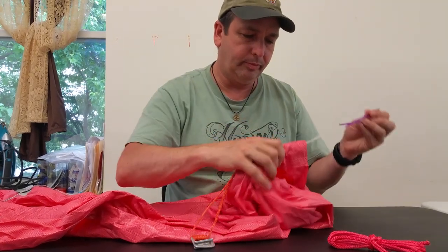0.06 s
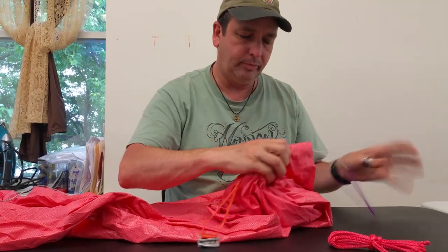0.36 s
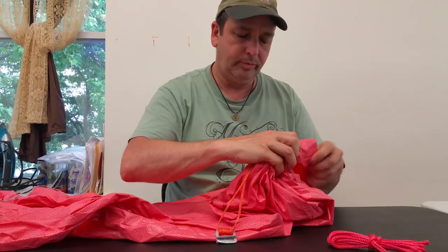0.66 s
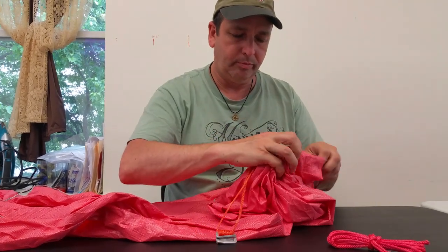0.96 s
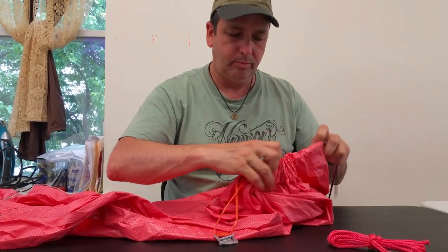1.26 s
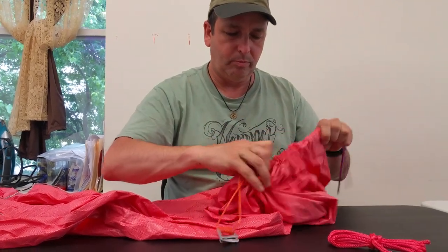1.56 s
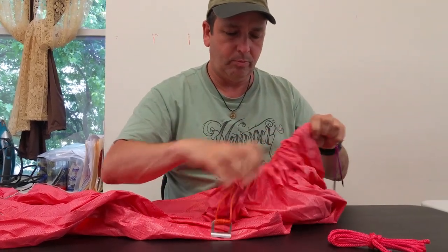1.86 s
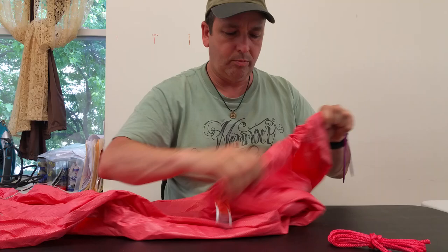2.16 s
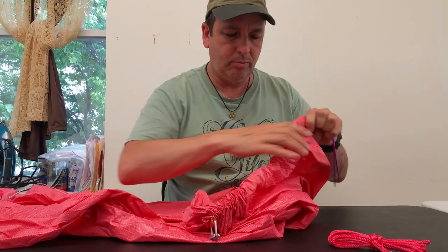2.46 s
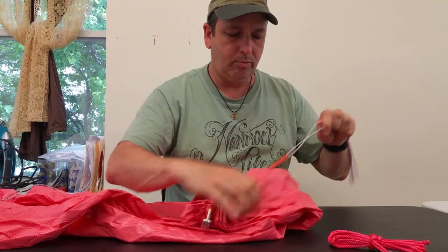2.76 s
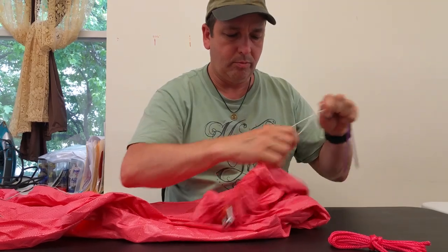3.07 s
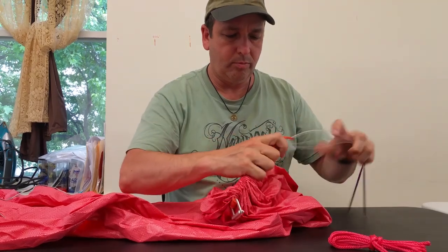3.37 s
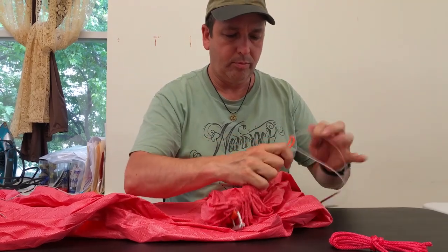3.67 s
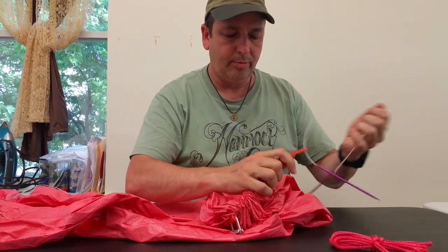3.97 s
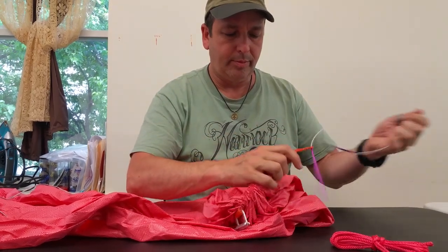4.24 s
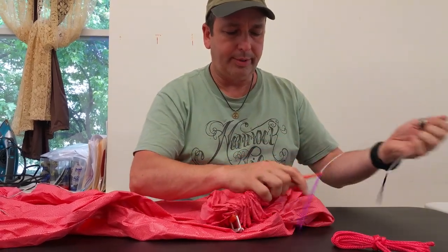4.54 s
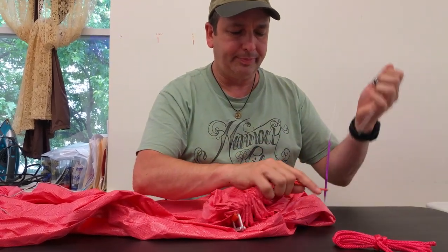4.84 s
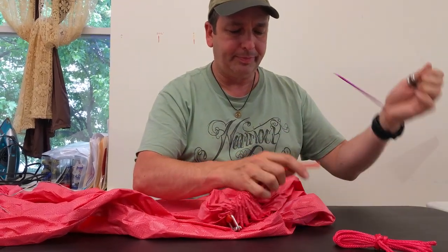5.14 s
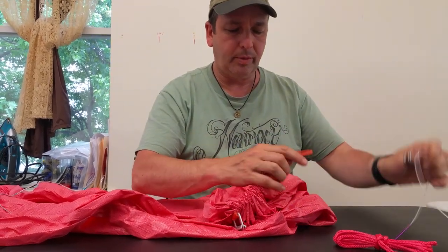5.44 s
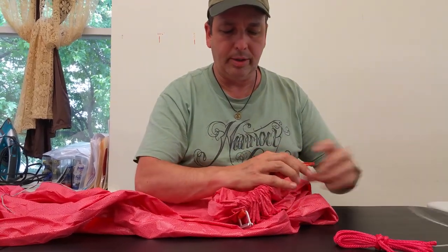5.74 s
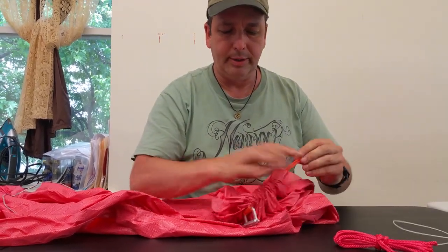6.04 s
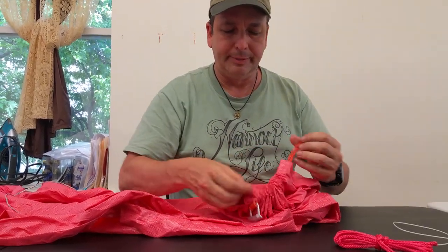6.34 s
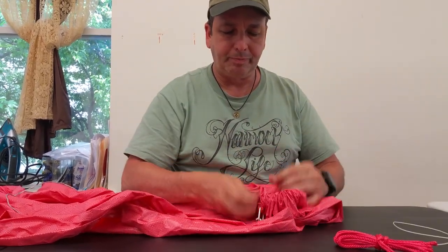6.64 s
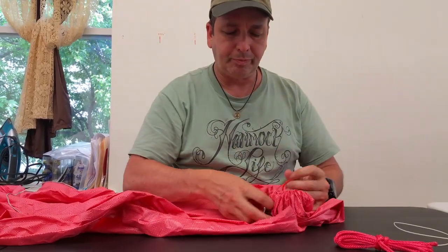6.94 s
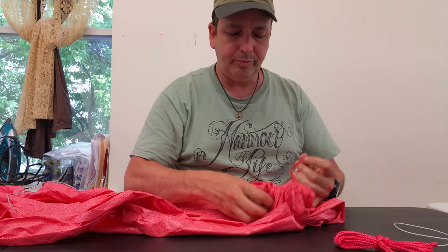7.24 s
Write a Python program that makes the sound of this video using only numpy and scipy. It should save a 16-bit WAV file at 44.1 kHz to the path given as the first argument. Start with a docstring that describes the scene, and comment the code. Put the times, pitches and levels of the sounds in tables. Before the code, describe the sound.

Soft fabric rustling with light table bumps, sharp buckle clinks and a few bright clatters of wire in a small room.

```python
"""A swish of thin nylon and a few soft bumps, then a bright clatter of wire: fabric is bunched along a cord
at a table in a small live room, a metre from the microphone. Cloth rubs on cloth and its creases crinkle.
The cord's stiff threading wire taps, scrapes and twangs on the table top, a small metal buckle clinks,
and hands bump the table. Quiet room air and a mains hum lie underneath."""
import sys
import numpy as np
from scipy import signal
from scipy.fft import rfft, irfft, next_fast_len
from scipy.io import wavfile
from scipy.ndimage import uniform_filter1d

SR = 44100
rng = np.random.default_rng(int(sys.argv[2]) if len(sys.argv) > 2 else 0)


def materialize(psi):
    """Save the field psi as 16-bit PCM at rate SR to the path in sys.argv[1].

    A 1-D psi becomes a single channel; in a 2-D psi each row is a channel.
    """
    bounded = np.clip(np.atleast_2d(psi).T, -1, 1)
    quanta = np.round(bounded * 32767).astype(np.int16)
    wavfile.write(sys.argv[1], SR, quanta)


N = 322099

# Hands push and pull the cloth. Each row: middle in seconds, length in seconds, level in dB, treble in dB.
CLOTH_FOLDS = [(0.01, 0.13, -42, -3), (0.19, 0.22, -53, 4.5), (0.408, 0.086, -48.5, -6),
               (0.748, 0.29, -43.5, -14), (0.986, 0.23, -49.5, -0.5), (1.3, 0.16, -49, 3),
               (1.379, 0.059, -42.5, 0.5), (1.565, 0.18, -53.5, 0.5), (1.707, .1, -46, -3),
               (1.86, 0.11, -47.5, 3.5), (2.028, 0.097, -52, 4.5), (2.169, 0.077, -48, 1.5),
               (2.311, 0.1, -39.5, 5), (2.424, 0.18, -54, 11), (2.77, 0.13, -43.5, 1),
               (2.872, 0.16, -50, 6), (2.996, 0.084, -54, 2.5), (3.207, 0.088, -47.5, 3.5),
               (3.373, 0.093, -56, 2.5), (3.87, 0.27, -62, 6), (4.314, 0.072, -66, 0),
               (4.555, 0.35, -66.5, 5.5), (5.08, .13, -63, 1.5), (5.422, .08, -69.5, 5),
               (5.994, 0.21, -51, -23), (6.452, 0.17, -58.5, 5.5), (6.688, 0.1, -58.5, 4),
               (6.933, 0.3, -56.5, 3), (7.23, 0.38, -56, 2)]
# Cloth sliding on cloth. Each row: frequency in Hz, gain in dB.
SWISH_EQ = [(60, -20.5), (150, 0.5), (400, -5), (800, -1.5), (1900, 1.5), (3200, -0.5), (5000, -7),
            (8000, -14.5), (12000, -12.5), (16000, -13)]
# Wire hits the table. Each row: start in seconds, level in dB, pitch in Hz, treble in dB,
# chatter length in seconds.
WIRE_TAPS = [(0.4707, -17.5, 1920, 8.5, 0.012), (0.4831, -19.5, 2240, 12, 0.011),
             (0.5425, -23, 2340, -6, 0.005), (0.5642, -21.5, 2230, -18, 0.0042),
             (0.639, -26, 2280, -7, 0.014), (0.7838, -26, 1770, -8, 0.0077),
             (0.8126, -28, 1860, -12, 0.0071), (0.8324, -30.5, 1850, -10, 0.0063),
             (0.877, -27, 2130, -12, 0.012), (0.9354, -31.5, 2210, -3, 0.02), (0.993, -42, 2290, 13, .011),
             (1.1445, -38, 1840, -17, 0.0046), (1.1773, -30.5, 2410, 2, 0.017),
             (1.2892, -37, 1880, -4, 0.03), (1.721, -35.5, 2480, -38, 0.021),
             (1.987, -36, 2040, -19, 0.0062), (3.49, -17.5, 2330, -6, .01), (3.505, -22, 2350, 6, 0.012),
             (3.9465, -35.5, 2190, 2, 0.016), (4.395, -46.5, 2550, 13, 0.017),
             (4.6767, -20, 2350, 7.5, 0.0037), (5.4602, -15, 2250, 7.5, 0.0097),
             (5.508, -23.5, 2360, 10.5, 0.026), (5.5719, -13, 2670, 13, 0.0065),
             (5.815, -18.5, 1910, 15.5, 0.0096), (6.036, -41.5, 2520, 4.5, .006),
             (6.507, -46, 2460, 18, 0.003), (6.989, -45.5, 2240, 5, 0.0083)]
# The broad clack of wire on table. Each row: frequency in Hz, gain in dB.
CLACK_EQ = [(80, -43.5), (250, -7.5), (600, -9), (1000, -7), (1450, -9), (1900, -3), (2400, -5),
            (2750, -6.5), (3200, -10.5), (4100, -8.5), (5200, -21), (7000, -29), (9000, -39.5),
            (16000, -36.5)]
# Wire drags. Each row: start in seconds, length in seconds, level in dB, fade in dB, treble in dB.
WIRE_SCRAPES = [(0, 0.097, -37.5, -7.5, -26), (0.485, 0.093, -20.5, -12.5, 7), (0.6, 0.065, -29.5, 1, 0),
                (0.789, 0.056, -32, -6.5, -6), (0.937, 0.046, -30.5, -14.5, 4),
                (3.491, .14, -22, -16, -2.5), (3.65, 0.053, -30.5, -3, 0.5), (3.72, .12, -31.5, -7, 1),
                (5.576, 0.05, -34, -4.5, 20), (5.627, 0.032, -30, -4, 14.5), (5.655, .07, -44, 1, 1)]
# Wire springs clear of the table. Each row: start in seconds, level in dB, pitch in Hz.
WIRE_TWANGS = [(1.18, -30.5, 2600), (5.46, -30, 2250)]
# Buckle hits. Each row: start in seconds, level in dB, extra ring in dB.
BUCKLE_CLINKS = [(0.4714, -22, -10), (0.633, -39, 11), (0.8571, -30.5, -10), (0.9419, -30.5, -15),
                 (1.6512, -21, -11), (1.719, -24.5, -11), (1.871, -32, 4), (2.2563, -20, 2),
                 (2.3127, -23, -12), (2.322, -25, 13), (2.332, -11.5, 3), (2.3427, -22, 5),
                 (2.3787, -19, -6), (2.4007, -28.5, 14.5), (2.4955, -15.5, 8), (2.5135, -23.5, 14.5),
                 (3.169, -34, -4), (3.236, -31.5, 6), (3.3033, -24.5, -13), (3.3136, -26.5, -5),
                 (5.9987, -36.5, -17), (7.1483, -30.5, -18), (7.287, -23, 4)]
# The buckle's ring. Each row: frequency in Hz, level in dB, time to fall 60 dB in seconds.
BUCKLE_MODES = [(5400, -9, .04), (5750, -11, .03), (6212, -16, .04), (7364, -17, .06), (15220, 0, .21),
                (15720, -20, .1)]
# The tick of metal on metal. Each row: frequency in Hz, gain in dB.
TICK_EQ = [(500, -25), (2500, -9.5), (4500, -2), (5600, 2), (9000, -8), (13000, -5.5), (15000, 1.5),
           (16300, 6.5)]
# Hands and buckle bump the table. Each row: start in seconds, level in dB, contact time in seconds.
TABLE_BUMPS = [(0.083, -28, 0.0013), (0.093, -26, 0.00064), (0.114, -30.5, 0.00081), (0.389, -35, 0.00045),
               (0.797, -35, 0.00029), (1.27, -38, 0.00078), (1.411, -35.5, 0.0012), (1.651, -36, 0.00043),
               (1.9843, -18.5, 0.0013), (2.536, -35, 0.0062), (2.62, -38, 0.00075), (6.095, -44.5, 0.00077),
               (6.81, -49, .008)]
# The table top's boom. Each row: frequency in Hz, level in dB, time to fall 60 dB in seconds.
TABLE_MODES = [(125, -2.5, 0.023), (179.3, -0.5, 0.1), (231, -10.5, 0.13), (317, -1.5, 0.075),
               (382.7, -1, 0.27), (447.4, 2, 0.059), (487.5, -2, 0.046), (627, -2, 0.039), (720, -10, 0.12)]
# Reverb length. Each row: frequency in Hz, time to fall 60 dB in seconds.
REVERB_T60 = [(120, 0.54), (350, 0.41), (900, 0.42), (2200, 0.53), (5000, 0.43), (15000, 0.67)]
# Colour of the reflections. Each row: frequency in Hz, gain in dB.
REVERB_EQ = [(80, -8.5), (180, 4), (450, 7.5), (1000, 0.5), (2300, -5.5), (4500, -3), (9000, -2),
             (15000, -8)]
# Still room air. Each row: frequency in Hz, gain in dB.
AIR_EQ = [(25, -13.5), (60, -2), (120, -2), (220, -11.5), (350, -16), (650, -25.5), (1500, -26.5),
          (2800, -27), (5000, -33), (8000, -39.5), (16000, -39)]
# Mains hum. Each row: frequency in Hz, level in dB.
HUM_TONES = [(59.5, -74.5), (119, -69.5), (232, -70)]
# The background's rumble sinks and returns. Each row: time in seconds, bass gain in dB.
RUMBLE_RIDE = [(0, 5), (2.5, 2.5), (4.2, 1), (5.3, -1.5), (6.2, -6), (6.6, -8), (7.3, 0.5)]
# The whole mix dips briefly inside a late clatter. Each row: time in seconds, gain in dB.
MIX_DIP = [(5.535, 0), (5.552, -9), (5.568, -9), (5.5715, 0)]
# Colour of the microphone's two ports. Each row: frequency in Hz, left over right in dB.
LEFT_OVER_RIGHT = [(100, 4), (500, 2.5), (1100, 4.5), (2200, 7), (4400, 3), (8000, -3.5), (12000, 8.5),
                   (15200, 5)]


def cloth_swish(flutter_db=2.06, crinkle_db=-3, snap_db=-11, resting_db=-83):
    """Threads rub in a fine swish that comes in folds; creases buckle in tiny snaps."""
    t = np.arange(N) / SR
    power, treble = np.full((2, N), undb(resting_db) ** 2)  # cloth stirs under resting hands
    for s, length_s, db, bright_db in CLOTH_FOLDS:
        from_middle = 2 * np.abs(t - s) / length_s
        shape = np.where(t < s, 1.86, 1.77)  # swell, then ease: 1 is pointed, 2 a bell
        fold = undb(db) ** 2 * np.exp(-np.minimum(from_middle ** shape, 20))
        power += fold
        treble += fold * undb(bright_db) ** 2
    rub = rng.standard_normal(N) + undb(crinkle_db) * grains(1500, 3.5) + undb(snap_db) * grains(45, 2.7)
    swish = unit(colour(rub * undb(flutter_db * wander(60)), SWISH_EQ))
    # taut cloth hisses higher than slack cloth
    return brighten(swish, 10 * np.log10(treble / power), corner_hz=4440) * np.sqrt(power)


def wire_taps(boom_db=-15, rattle_db=-15, rattle_s=0.014, note_db=6, apart_db=-3, jitter_s=0.00004):
    """Springy wire chatters on the table and sets it booming. Returns direct stereo and a reverb send."""
    left, right, send = np.zeros((3, N))
    t = np.arange(SR // 4) / SR
    for s, db, hz, bright_db, chatter_s in WIRE_TAPS:
        contact = np.exp(-(t / chatter_s) ** 4) + undb(rattle_db) * np.exp(-t / rattle_s)
        # the whole wire radiates, so each port hears a partly different chatter
        chatter = rng.standard_normal(len(t)) + undb(apart_db) * rng.standard_normal((2, len(t)))
        # a dull, flat landing moves the table more than a sharp one
        boom = undb(boom_db - 0.22 * bright_db) * ring(TABLE_MODES, len(t) / SR)
        blow = signal.unit_impulse(len(t))  # over all directions the chatter evens out to one blow
        for track, force in zip((left, right, send), (*(chatter * contact), blow)):
            clack = colour(force, CLACK_EQ)
            # the note depends on where along the wire it lands
            clack = brighten(clack + undb(note_db) * resonance(clack, hz, width_hz=260), bright_db)
            tap = undb(db) * np.sqrt(chatter_s * SR) * (clack / np.linalg.norm(clack) + boom)
            # it lands here and there, so the delay between the ports varies
            add(track, s + jitter_s * rng.standard_normal(), tap)
    return np.array([left, right]), send


def wire_scrapes(boom_db=-14, judder_db=2.5, note_db=4, attack_s=0.0052, release_s=0.0092):
    """The wire tip sticks and slips over the table: dense small clacks, in uneven spurts."""
    slips = grains(1200, 0.83) * undb(judder_db * wander(140))
    clacks = colour(slips, CLACK_EQ)
    scrape = unit(clacks + undb(note_db) * resonance(clacks, hz=2200, width_hz=420))
    boom = undb(boom_db) * unit(signal.fftconvolve(slips, ring(TABLE_MODES, .25))[:N])
    out = np.zeros(N)
    for s, length_s, db, fade_db, bright_db in WIRE_SCRAPES:
        age = np.maximum(np.arange(N) / SR - s, 0)
        bite = np.minimum(age / attack_s, 1)
        slowing = undb(fade_db * np.minimum(age / length_s, 1))
        lift_off = np.exp(-np.clip((age - length_s) / release_s, 0, 20))
        out += (brighten(scrape, bright_db) + boom) * undb(db) * bite * slowing * lift_off
    return out


def wire_twangs(t60_s=0.3, split_hz=120):
    """A free length of wire bends in two planes and rings at two close pitches."""
    out = np.zeros(N)
    for s, db, hz in WIRE_TWANGS:
        tone = ring([(hz + sign * split_hz / 2, 0, t60_s) for sign in (-1, 1)], .5)
        add(out, s, undb(db) * tone / np.abs(tone).max())
    return out


def buckle_clinks(tick_s=0.0021, tick_db=11.5, ring_db=-16):
    """The buckle's loose bar ticks against its frame, which rings very high."""
    out = np.zeros(N)
    for s, db, extra_ring_db in BUCKLE_CLINKS:
        tone = ring(BUCKLE_MODES, .35)
        t = np.arange(len(tone)) / SR
        tick = colour(rng.standard_normal(len(t)) * np.exp(-t / tick_s), TICK_EQ)
        add(out, s, undb(db + tick_db) * tick / np.linalg.norm(tick))
        add(out, s, undb(db + ring_db + extra_ring_db) * tone / np.abs(tone).max())
    return out


def table_bumps(knock_db=-9, knock_s=0.0072):
    """A soft push on the table: the longer the contact, the duller the thud."""
    out = np.zeros(N)
    for s, db, contact_s in TABLE_BUMPS:
        body = ring(TABLE_MODES, .3)
        t = np.arange(len(body)) / SR
        knock = rng.standard_normal(len(t)) * np.exp(-t / knock_s) / 2
        push = t * np.exp(-2 * np.pi * t / contact_s)
        thud = signal.fftconvolve(body + undb(knock_db) * knock, push)[:len(t)]
        add(out, s, undb(db) * thud / np.abs(thud).max())
    return out


def room_tails(predelay_s=0.00073, early_db=7, early_s=0.0022):
    """A reverb tail for each port: early bounces off table and body, then the bare walls."""
    t, tails = np.arange(SR) / SR, []
    onset = (t > predelay_s) * (1 + undb(early_db) * np.exp(-t / early_s))
    for noise in diffuse_noise():
        hz, s, bands = signal.stft(noise[:SR], SR, nperseg=256)
        decay_rate = np.log(1000) / lookup(REVERB_T60, hz)[:, None]
        decay = np.exp(-decay_rate * s) * np.sqrt(2 * decay_rate / SR)  # equal energy in every band
        tail = signal.istft(bands * decay, SR)[1][:SR]
        tails.append(colour(tail * onset, REVERB_EQ))
    return tails


def room_tone(air_db=-58.5):
    """A bed of quiet air and wavering mains hum, its low end slowly sinking and returning."""
    t = np.arange(N) / SR
    hum = sum(np.sqrt(2) * undb(db + wander(5.7)) * np.sin(2 * np.pi * hz * t) for hz, db in HUM_TONES)
    air = undb(air_db) * np.array([unit(colour(noise, AIR_EQ)) for noise in diffuse_noise()])
    bass_db = np.interp(t, *np.transpose(RUMBLE_RIDE))
    return brighten(air + hum, -bass_db, corner_hz=323.5) * undb(bass_db)


def diffuse_noise(alike_hz=750):
    """Noise at the two ports: mono in the bass, wide in the treble."""
    mid, side = rfft(rng.standard_normal((2, N)))
    alike = 1 / (1 + (np.fft.rfftfreq(N, 1 / SR) / alike_hz) ** 2)
    mid, side = mid * np.sqrt((1 + alike) / 2), side * np.sqrt((1 - alike) / 2)
    return [irfft(mid + side, N), irfft(mid - side, N)]


def place(direct, send, tails, lead_ms, wet_db):
    """Direct sound, reaching the right port lead_ms early, plus the reverb of the send."""
    left, right = np.broadcast_to(direct, (2, N))
    size = next_fast_len(N + SR)
    advance = np.exp(2j * np.pi * np.fft.rfftfreq(size, 1 / SR) * lead_ms / 1000)
    right = irfft(rfft(right, size) * advance, size)[:N]
    reverb = np.array([signal.oaconvolve(send, tail)[:N] for tail in tails])
    return np.array([left, right]) + undb(wet_db) * reverb


def ring(modes, length_s):
    """Ringing modes of unit total energy; each blow weights them a little differently."""
    t = np.arange(int(length_s * SR)) / SR
    tone = np.zeros(len(t))
    for hz, db, t60 in modes:
        weight = undb(db + 1.5 * rng.standard_normal()) * rng.choice([-1, 1])
        tone += weight * np.cos(2 * np.pi * hz * t) * undb(-60 * t / t60)
    return tone / np.linalg.norm(tone)


def grains(per_second, spread_db):
    """Random clicks, many small and a few large."""
    size = undb(spread_db * np.minimum(rng.exponential(size=N), 5))
    return unit((rng.random(N) < per_second / SR) * size * rng.choice([-1, 1], N))


def wander(rate_hz):
    """Smooth random drift of rms 1."""
    hold = max(int(SR / rate_hz), 2)
    steps = np.repeat(rng.standard_normal(N // hold + 1), hold)
    return unit(uniform_filter1d(steps, hold)[:N])


def colour(x, eq, size=2048):
    """Minimum-phase EQ through (Hz, dB) points, by way of the cepstrum."""
    cepstrum = irfft(np.log(undb(lookup(eq, np.fft.rfftfreq(size, 1 / SR)))))
    cepstrum[1:size // 2] *= 2
    cepstrum[size // 2 + 1:] = 0
    return signal.fftconvolve(x, irfft(np.exp(rfft(cepstrum))))[:len(x)]


def brighten(x, db, corner_hz=3400):
    """Treble shelf, up or down."""
    low = signal.sosfiltfilt(signal.butter(2, corner_hz, fs=SR, output="sos"), x)
    return low + undb(db) * (x - low)


def resonance(x, hz, width_hz):
    """One damped mode, gain 1 at its centre."""
    return signal.lfilter(*signal.iirpeak(hz, hz / width_hz, fs=SR), x)


def lookup(points, hz):
    """Read a (Hz, value) table on a log-frequency axis."""
    f, value = np.transpose(points)
    return np.interp(np.log(hz + 1), np.log(f), value)


def add(track, s, sound):
    """Mix a sound in at s seconds."""
    i = max(int(s * SR), 0)
    track[i:i + len(sound)] += sound[:N - i]


def undb(db):
    """Decibels to gain."""
    return 10 ** (np.asarray(db) / 20)


def unit(x):
    """Scale to rms 1."""
    return x / np.sqrt(np.mean(x ** 2) + 1e-20)


def scene(buckle_left_db=3):
    """Cloth, wire, buckle and table share one room, over the room tone."""
    tails = room_tails()
    scrape_and_twang = wire_scrapes() + wire_twangs()
    swish, clink, thud = cloth_swish(), buckle_clinks(), table_bumps()
    fabric = place(swish, swish, tails, lead_ms=0.039, wet_db=-6.5)
    # the wire lies to the right of the hands, the buckle towards the left
    wire = place(*wire_taps(), tails, lead_ms=0.086, wet_db=-2.5)
    wire += place(scrape_and_twang, scrape_and_twang, tails, lead_ms=0.11, wet_db=0.5)
    buckle_pan = undb(np.array([[1], [-1]]) * buckle_left_db / 2)
    buckle = place(clink, clink, tails, lead_ms=0.012, wet_db=-8) * buckle_pan
    table = place(thud, thud, tails, lead_ms=0.012, wet_db=-3.5)
    dip = undb(np.interp(np.arange(N) / SR, *np.transpose(MIX_DIP)))
    return (fabric + wire + buckle + table + room_tone()) * dip


def record(dry, low_cut_hz=55, top_hz=16400, ceiling=0.8):
    """Each port has its own colour; then a low cut, a hard clip and a steep top cut."""
    ports = [colour(x, [(hz, sign * db / 2) for hz, db in LEFT_OVER_RIGHT])
             for x, sign in zip(dry, (1, -1))]
    thin = signal.sosfilt(signal.butter(2, low_cut_hz, "highpass", fs=SR, output="sos"), np.array(ports))
    clipped = np.clip(thin, -ceiling, ceiling)
    return signal.sosfilt(signal.ellip(8, .2, 70, top_hz, fs=SR, output="sos"), clipped)


dry = scene()
out = record(dry)
materialize(out)
```